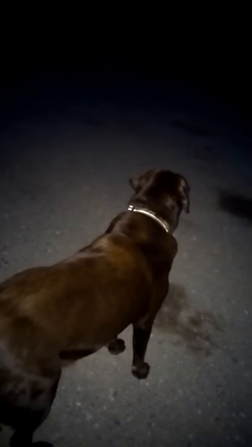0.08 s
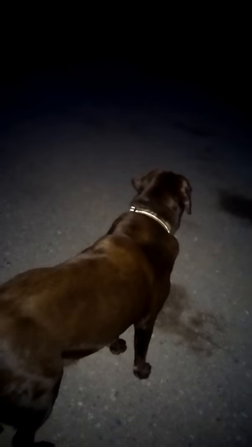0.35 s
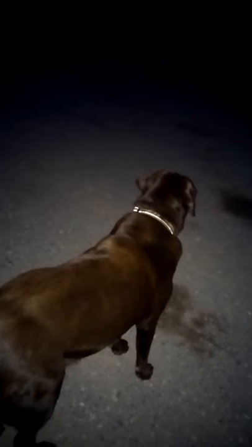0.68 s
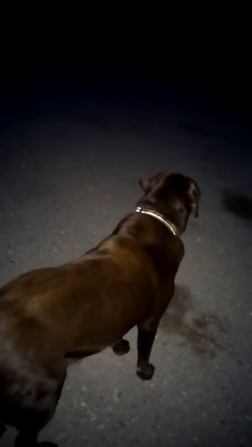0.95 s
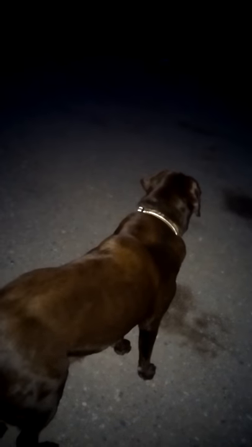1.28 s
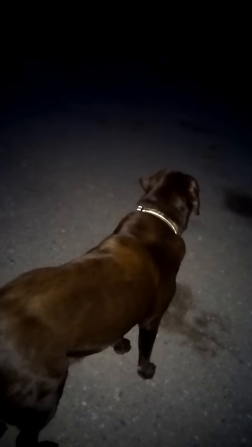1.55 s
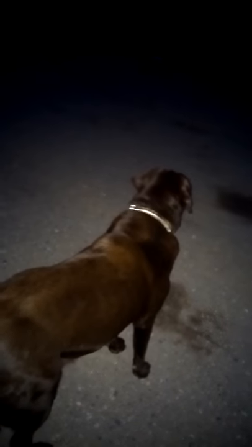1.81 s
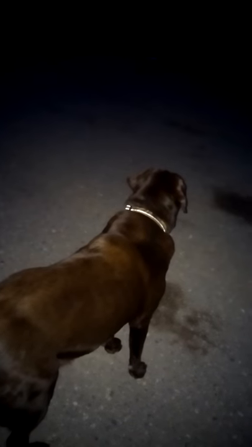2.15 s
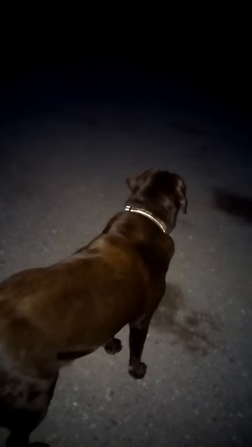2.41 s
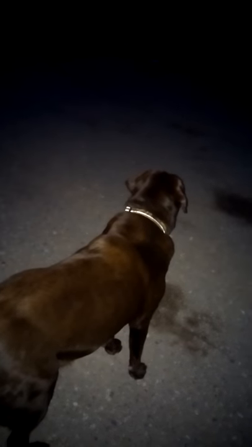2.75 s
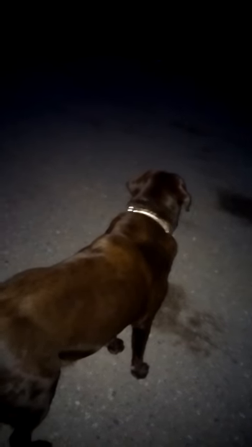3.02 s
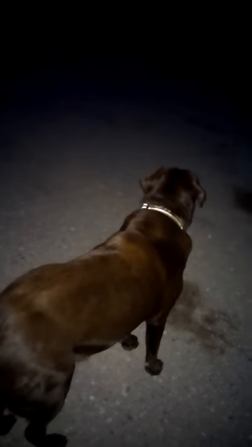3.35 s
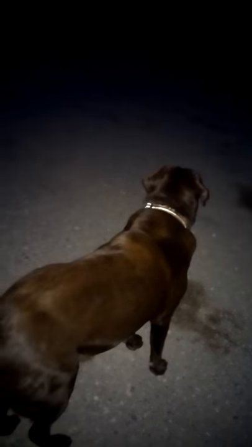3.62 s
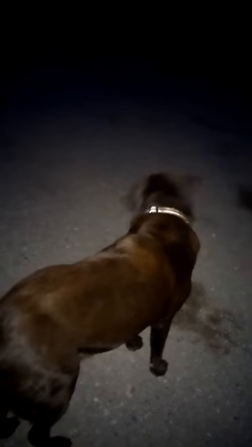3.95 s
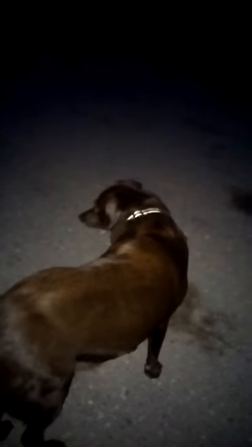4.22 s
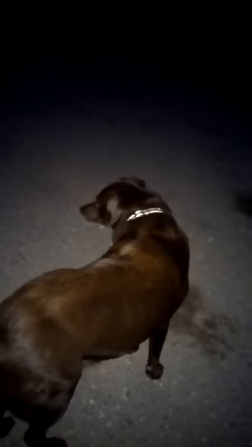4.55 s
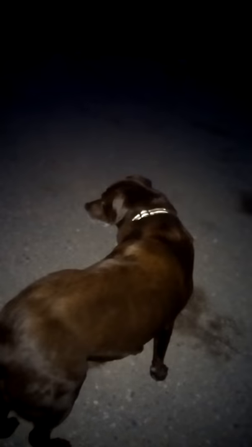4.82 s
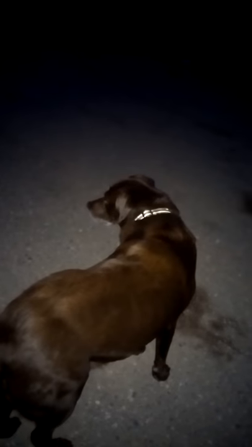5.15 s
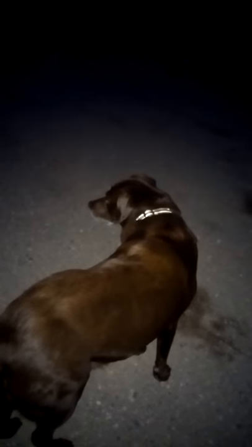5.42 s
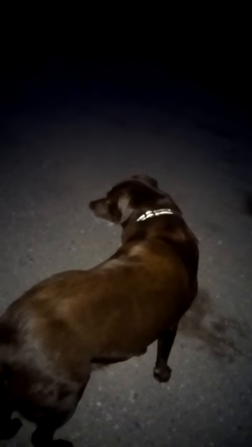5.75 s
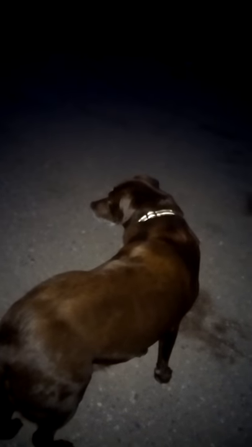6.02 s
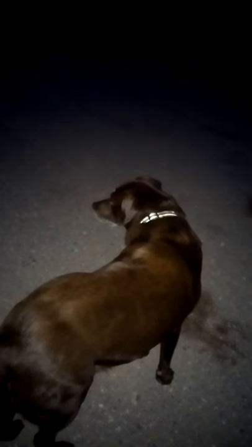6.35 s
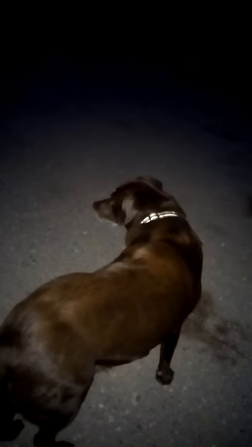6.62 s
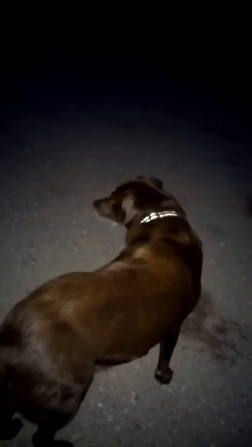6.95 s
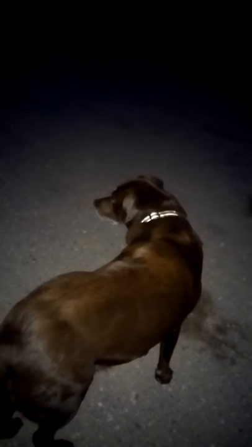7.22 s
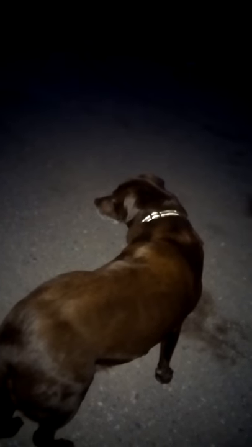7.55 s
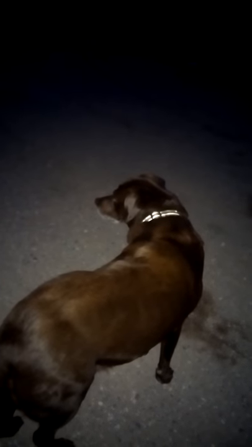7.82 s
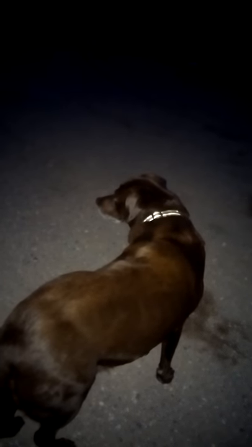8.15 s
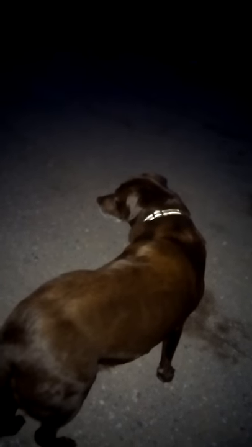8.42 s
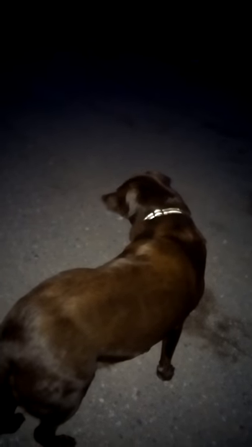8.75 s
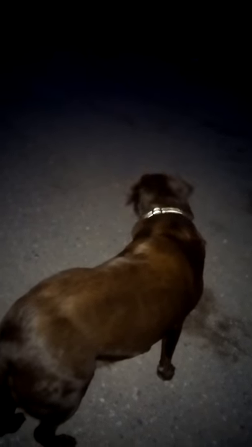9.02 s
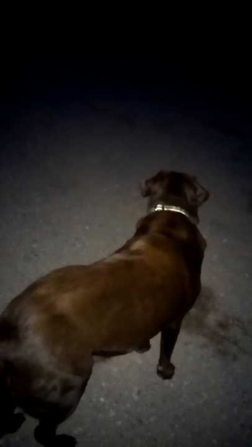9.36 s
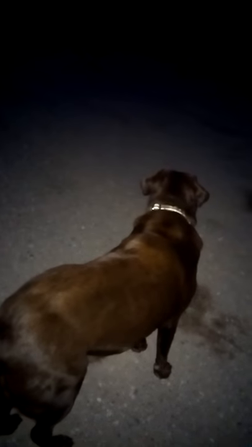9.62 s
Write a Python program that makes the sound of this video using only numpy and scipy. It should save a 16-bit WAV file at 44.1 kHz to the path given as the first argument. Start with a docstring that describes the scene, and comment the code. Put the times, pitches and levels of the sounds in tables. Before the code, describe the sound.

The setting is quiet open country at night. Right at the start, a distant coyote gives about six quick, high yips, each rising and falling in pitch with a slight break and a dull echo, ending by 0.8 seconds. From about 1 to 4 seconds there is only a faint low rumble, sputtering in short irregular swells, with thin microphone hiss flickering along with it. The rumble grows after 4 seconds. A faraway vehicle passes on the left, its soft tyre roar peaking just after 5 seconds and fading by 7. From about 7.5 seconds the rumble is stronger and carries a low, slowly rising engine drone. Between 8 and 8.7 seconds the coyote gives five more wavering yips, rougher and a little higher. The fluttering rumble, drone and hiss continue until the end, near 10 seconds.

```python
"""Open country on a still night. A far coyote gives two runs of wavering yips, each one arch of pitch
and effort, shaped by the throat and followed by a dull echo. Low rumble flutters and grows; a distant
vehicle passes with tyre noise and a slowly rising engine drone. The recorder's noise gate opens on
every swell, so the whole background and the microphone hiss flutter."""
import sys
import numpy as np
from scipy import signal
from scipy.fft import next_fast_len
from scipy.io import wavfile
from scipy.ndimage import uniform_filter1d

SR = 44100
rng = np.random.default_rng(int(sys.argv[2]) if len(sys.argv) > 2 else 0)


def digitize_waveform(pressure):
    """Quantize a signal to 16-bit integers and store it at the path in sys.argv[1].

    Rows of a 2-D input are taken as channels; values are limited to [-1, 1].
    """
    field = np.atleast_2d(pressure).T
    bounded = np.clip(field, -1, 1)
    quanta = np.round(bounded * 32767).astype(np.int16)
    wavfile.write(sys.argv[1], SR, quanta)


N = 435708
TIME = np.arange(N) / SR


def from_db(db):
    """Decibels to gain."""
    return 10 ** (np.asarray(db) / 20)


def unit_rms(x):
    """Scale to rms 1."""
    return x / np.sqrt(np.mean(x ** 2) + 1e-20)


def in_time(rows):
    """Each column of a time curve, at every sample."""
    times_s, *columns = np.transpose(rows)
    return [np.interp(TIME, times_s, column) for column in columns]


def at_hz(points, hz):
    """Read a curve on a log-frequency axis."""
    points_hz, values = np.transpose(points)
    return np.interp(np.log(hz), np.log(points_hz), values)


def pan(left_db):
    """Constant-power stereo gains."""
    return unit_rms(from_db(np.array([[left_db], [-left_db]]) / 2))


def delayed(x, delay_s):
    """One channel, delayed."""
    return np.interp(TIME - delay_s, TIME, x, left=0)


def drift(rate_hz):
    """Smooth random curve, rms 1."""
    pole = np.exp(-40 * np.pi * rate_hz / SR)
    slow = signal.lfilter([1], [1, -2 * pole, pole * pole], rng.standard_normal(N // 20 + 2002))[2000:]
    return np.interp(np.arange(N) / 20, np.arange(len(slow)), unit_rms(slow))


def flutter(rate_hz, limit=2.14):
    """Soft-limited drift."""
    return limit * np.tanh(drift(rate_hz) / limit)


def hump(progress, top_at):
    """Half sine over progress 0 to 1, peaking at top_at."""
    return np.abs(np.sin(np.pi * np.interp(progress, [0, np.clip(top_at, .1, .9), 1], [0, .5, 1])))


def bump(time_s, half_s, skew=.39):
    """Gaussian of height 1; skew steepens the rise and draws out the fall."""
    out = np.zeros(N)
    near = slice(*np.searchsorted(TIME, [time_s - 5 * half_s, time_s + 5 * half_s]))
    offset = (TIME[near] - time_s) / half_s + skew
    out[near] = np.exp(-(offset / (1 + skew * np.sign(offset))) ** 2)
    return out


def banded_noise(spectrum, correlation, glide=1, per_octave=3):
    """Stereo noise, rms 1; glide shifts the spectrum by a frequency ratio."""
    edges_hz = 20 * 2 ** (np.arange(10 * per_octave) / per_octave)
    white, out = rng.standard_normal((2, 2, N)), 0
    for k, band in enumerate(zip(edges_hz, edges_hz[1:])):
        hz = np.sqrt(band[0] * band[1])
        if spectrum[0][0] < hz < spectrum[-1][0]:
            mid, side = signal.sosfilt(signal.butter(2, band, "band", fs=SR, output="sos"), white[k % 2])
            alike = correlation if np.isscalar(correlation) else at_hz(correlation, hz)
            stereo = np.sqrt(1 + alike) * mid + np.sqrt(1 - alike) * side * [[1], [-1]]
            out = out + from_db(at_hz(spectrum, hz / glide)) * stereo
    return unit_rms(out)


def evened(x, span_s):
    """Level out swings slower than span_s, to rms 1."""
    window = signal.windows.hann(int(span_s * SR))
    power = np.mean(np.abs(signal.hilbert(x, next_fast_len(N))[:, :N]) ** 2, axis=0) / 2
    return x / np.sqrt(signal.fftconvolve(power, window / window.sum(), "same") + 1e-9)


# Yips, before register break and throat: (start [s], crest [s], end [s], start pitch [Hz],
# crest pitch [Hz], effort [dB], overtone [dB], roughness [0-1], effort peak [share of length])
YIPS = [(-.06, .003, .048, 780, 982, -40.5, -.5, .55, .8), (.103, .158, .208, 812, 945, -38.8, -1, .1, .36),
        (.208, .284, .35, 810, 1008, -37.7, -1, .22, .5), (.35, .427, .492, 770, 938, -39, -.5, .1, .45),
        (.492, .558, .63, 846, 926, -38.5, -1.5, .05, .42),
        (.644, .703, .753, 810, 903, -40.3, -2.5, .05, .48),
        (7.994, 8.052, 8.072, 725, 826, -35.5, -9, 1, .45),
        (8.165, 8.215, 8.265, 785, 925, -40.3, -2, .3, .36),
        (8.265, 8.332, 8.392, 800, 1065, -44, 1.5, .7, .28),
        (8.392, 8.462, 8.526, 918, 1097, -39.3, .5, .3, .5),
        (8.526, 8.603, 8.651, 815, 1050, -43, 1.5, .5, .6)]


def yip_controls(edge_s=.0069, join_s=.025, rest_hz=703, trough_db=-11.5, break_hz=822, drop_hz=69):
    """Pitch and effort arch in each yip; under break_hz the voice breaks to a lower register."""
    pitch_hz, effort, overtone_db, rough, voiced = np.zeros((5, N))
    for yip, following in zip(YIPS, YIPS[1:] + [None]):
        start_s, crest_s, end_s, start_hz, crest_hz, effort_db, bright_db, roughness, peak_at = yip
        if following and following[0] < end_s + join_s:   # falls into the next yip
            end_s, end_hz, fall_exponent = following[0], following[3], 1.8
        else:   # breaks off with a plunge
            end_hz, fall_exponent = rest_hz, .5
        near = slice(*np.searchsorted(TIME, [start_s - edge_s, end_s + edge_s]))
        t, length_s, rise_s = TIME[near] - start_s, end_s - start_s, crest_s - start_s
        rising = t < rise_s
        arch = hump(t / length_s, rise_s / length_s) ** np.where(rising, 1.8, fall_exponent)
        push = hump(t / length_s, peak_at) ** .92
        fade = np.clip(np.minimum(t, length_s - t) / edge_s + .5, 0, 1)
        foot_hz = np.where(rising, start_hz, end_hz)
        pitch_hz[near] += fade * (foot_hz + arch * (crest_hz - foot_hz))
        effort[near] += fade * from_db(effort_db + trough_db * (1 - push))
        overtone_db[near] += fade * bright_db
        rough[near] += fade * roughness * arch ** 2
        voiced[near] += fade
    pitch_hz /= np.maximum(voiced, 1e-12)
    low_register = (1 - np.tanh((pitch_hz - break_hz) / 5.5)) / 2
    return pitch_hz - drop_hz * low_register, effort, overtone_db, rough


# Response of throat and long air path: (frequency [Hz], gain [dB])
THROAT = [(680, -10.5), (750, -17.5), (810, -1.5), (920, 0.07), (1010, -3.5), (1110, -6), (1260, -5),
          (1450, -1.5), (1540, 0.5), (1650, -7.5), (1850, -17), (2150, -19.5), (2350, -23), (2800, -32),
          (3100, -40)]


def coyote(break_hz=822, third_db=-9, right_lead_rad=1.23):
    """A nearly pure voice shaped by the throat; rough yips jitter, shake and double their period."""
    pitch_hz, effort, overtone_db, rough = yip_controls(break_hz=break_hz)
    jitter = (.0052 + .028 * rough) * drift(132)
    shimmer_db = (1 + 3.5 * rough) * flutter(36)
    rasp = (.066 + .33 * rough) * drift(107)
    pitch_hz = pitch_hz * (1 + jitter)
    effort = effort * from_db(shimmer_db) * (1 + rasp)
    on, out = effort > 0, np.zeros((2, N))
    phase = 2 * np.pi * np.cumsum(pitch_hz[on]) / SR
    lead_rad = np.array([[0], [right_lead_rad]])   # direct and ground paths sum differently per side
    overtone = from_db(overtone_db[on]) * pan(.3)
    doubling = .3 * rough[on] * (pitch_hz[on] > break_hz)   # upper register only
    for ratio, gain in ((1, pan(3.4)), (1.5, doubling), (2, overtone), (3, overtone * from_db(third_db))):
        throat = from_db(at_hz(THROAT, ratio * pitch_hz[on]))
        out[:, on] += gain * throat * np.sin(ratio * phase + lead_rad)
    return np.sqrt(2) * effort * out


def echoes(x, echo_s=.047, echo_db=-18, cutoff_hz=1170, scatter_db=-16, scatter_s=.03, count=40):
    """One dull echo; ground and brush add faint ones, different on each side."""
    lowpass = signal.butter(3, cutoff_hz, fs=SR, output="sos")
    out = x.copy()
    for side, direct in zip(out, x):
        side += from_db(echo_db) * signal.sosfilt(lowpass, delayed(direct, echo_s))
        delays_s = .00212 + rng.exponential(scatter_s, count)
        gains = rng.standard_normal(count) * np.exp(-delays_s / (2 * scatter_s))
        for lag, gain in zip((delays_s * SR).astype(int), gains / np.linalg.norm(gains)):
            side[lag:] += from_db(scatter_db) * gain * direct[:N - lag]
    return out


# Slow course of the rumble: (time [s], level [dB])
RUMBLE_COURSE = [(0.0, -48), (0.7, -49), (0.8, -57.5), (1.4, -57), (2.5, -57.5), (2.9, -59.5),
                 (3.45, -54.5), (3.7, -63.5), (4.05, -57), (4.2, -44.5), (4.7, -48.5), (5.4, -50),
                 (5.9, -46.5), (6.45, -47), (7.42, -51), (7.62, -42), (8.3, -43.5), (9.88, -43.0)]
# Brief dips: (time [s], half length [s])
LULLS = [(0.098, 0.012), (0.628, 0.029), (4.235, 0.021), (4.434, 0.025), (4.994, 0.008), (5.359, 0.021),
         (5.478, 0.012), (5.617, 0.0079), (5.78, 0.0027), (6.132, 0.013), (6.513, 0.013), (6.57, 0.0072),
         (6.707, 0.013), (6.778, 0.0079), (6.905, 0.0086), (7.012, 0.02), (7.141, 0.011), (7.412, 0.018),
         (7.809, 0.017), (7.927, 0.0063), (8.134, 0.03), (8.274, 0.016), (8.724, 0.012), (8.983, 0.0072),
         (9.344, 0.0067), (9.461, 0.027), (9.751, 0.0075)]
# Short added swells: (time [s], level [dB], half length [s])
SWELLS = [(0.866, -49, 0.0075), (0.969, -47.0, 0.011), (1.073, -43, 0.01), (1.102, -46.5, 0.011),
          (1.184, -43.5, 0.012), (1.216, -48, 0.014), (1.452, -47, 0.01), (1.565, -49, 0.0076),
          (1.705, -46.5, 0.0092), (1.823, -45.5, 0.0083), (1.996, -47, 0.0086), (2.033, -47.5, 0.01),
          (2.069, -45.5, 0.0084), (2.124, -45, 0.0083), (2.22, -50.5, 0.018), (2.292, -44.0, 0.018),
          (2.351, -50, 0.0046), (2.389, -49.5, 0.0046), (2.597, -48.5, 0.0091), (2.638, -48.5, 0.011),
          (2.67, -52, 0.008), (2.748, -44, 0.013), (2.793, -44.5, 0.018), (2.945, -46.5, 0.0083),
          (2.974, -50, 0.007), (3.019, -48, 0.0077), (3.058, -50.5, 0.01), (3.108, -45.5, 0.0074),
          (3.141, -47.5, 0.009), (3.215, -42, 0.0071), (3.255, -46, 0.012), (3.323, -46.5, 0.019),
          (3.351, -47.5, 0.0058), (3.406, -49, 0.011), (3.452, -44, 0.013), (3.49, -43.5, 0.012),
          (3.548, -48, 0.006), (3.594, -52.5, 0.017), (3.677, -51, 0.011), (3.773, -51.5, 0.01),
          (3.862, -47.5, 0.017), (4.042, -44.5, 0.006), (4.08, -46, 0.0065), (4.141, -42, 0.016),
          (4.179, -46.5, 0.014), (4.349, -41, 0.0059), (4.551, -45.5, 0.01), (4.664, -48.5, 0.023),
          (4.741, -45, 0.0028), (4.918, -43, 0.013), (5.583, -47.0, 0.019), (5.81, -44, 0.018),
          (5.881, -44, 0.021), (6.045, -42, 0.018), (6.157, -43.5, 0.0081), (6.233, -48.5, 0.0045),
          (6.28, -42, 0.024), (6.358, -42, 0.025), (6.459, -45, 0.013), (6.533, -44.5, 0.0062),
          (6.615, -41, 0.019), (6.688, -46.5, 0.009), (6.736, -40, 0.011), (6.799, -44, 0.0093),
          (6.863, -41, 0.012), (6.924, -44, 0.0057), (6.971, -41.5, 0.016), (7.054, -41.5, 0.015),
          (7.11, -41, 0.0073), (7.187, -42.5, 0.031), (7.26, -43, 0.025), (7.306, -42, 0.0052),
          (7.371, -42.5, 0.0058), (7.452, -44.5, 0.019), (7.533, -43, 0.019), (7.63, -43.5, 0.03),
          (7.762, -41, 0.0089), (7.829, -40.5, 0.012), (7.87, -42, 0.014), (7.983, -43, 0.049),
          (8.703, -42, 0.015), (8.822, -41.5, 0.048), (8.906, -40.5, 0.0056), (9.112, -42.5, 0.013),
          (9.22, -40.5, 0.056), (9.395, -42.5, 0.015), (9.558, -44.5, 0.0037), (9.665, -43.0, 0.028),
          (9.804, -44, 0.012)]


def rumble_sputter(flutter_db=1.7, lull_db=-11):
    """The rumble flutters, dips and swells; returns its power and the ratio to its slow course."""
    course_db, = in_time(RUMBLE_COURSE)
    lulls = sum(bump(time_s, half_s, skew=0) for time_s, half_s in LULLS)
    swells = sum(from_db(db) ** 2 * bump(time_s, half_s) for time_s, db, half_s in SWELLS)
    power = from_db(course_db + flutter_db * flutter(29.5) + lull_db * lulls) ** 2 + swells
    return power, power / from_db(course_db) ** 2


# Engine: (time [s], firing rate [Hz], level re rumble noise [dB])
ENGINE = [(0, 133.6, -29.5), (5.4, 135.1, -18.5), (6.1, 139.7, -9), (7.3, 136.4, -13.5), (7.7, 137.5, -1),
          (8.3, 141.1, 0.5), (8.8, 142, 2.5), (9.88, 144.3, 4)]


def engine_drone(waver_db=4):
    """Wavering firing tone with a faint half order and octave."""
    firing_hz, level_db = in_time(ENGINE)
    phase = 2 * np.pi * np.cumsum(firing_hz * (1 + .0054 * drift(4.3))) / SR
    tone = np.sin(phase) + from_db(-20.5) * np.sin(phase / 2) + from_db(-30) * np.sin(2 * phase)
    return np.sqrt(2) * from_db(level_db + waver_db * flutter(10.8)) * tone


# Rumble noise: (frequency [Hz], relative density [dB])
RUMBLE_SPECTRUM = [(25, -16), (42, -12.5), (55, -8), (70, 2.5), (95, 1.5), (135, 2), (180, -6.5),
                   (250, -15), (400, -19.5), (560, -22.5), (750, -25), (950, -32.5), (1200, -36.5)]
# Rumble width: (frequency [Hz], left-right correlation [0-1])
RUMBLE_CORRELATION = [(60, 0.89), (140, 0.93), (290, 0.36), (640, 0.042)]


def rumble(power):
    """Low noise and engine drone swell and sink together."""
    low = banded_noise(RUMBLE_SPECTRUM, RUMBLE_CORRELATION) + engine_drone()
    return evened(low, span_s=.034) * np.sqrt(power) * pan(4.3)


# Slow course of the tyre roar: (time [s], level [dB])
TYRE_COURSE = [(0.0, -54.5), (1.15, -58.5), (1.5, -63), (1.9, -63), (2.3, -59), (2.65, -56.5), (2.9, -58.5),
               (3.35, -53), (3.65, -56.5), (4.05, -64), (4.4, -57), (4.65, -49.5), (4.85, -50),
               (5.1, -44.5), (5.27, -43.5), (5.5, -49), (5.85, -50.5), (6.5, -56.5), (7.15, -64),
               (9.88, -63)]
# Brief added surges: (time [s], level [dB])
TYRE_SURGES = [(2.675, -51), (3.352, -51), (4.742, -58), (5.05, -44), (5.095, -42.5), (5.215, -44.5),
               (5.251, -44.5), (5.344, -43), (5.437, -45.5), (5.709, -46)]
# Brightness, rising again at closest approach: (time [s], centre [Hz])
TYRE_CENTRE = [(0, 810), (1.3, 870), (2.4, 835), (3.3, 775), (4.2, 713), (4.7, 713), (4.92, 768),
               (5.14, 840), (5.3, 835), (5.5, 793), (6.45, 764), (7, 735), (9.88, 770)]
# Tyre noise centred on reference_hz: (frequency [Hz], relative density [dB])
TYRE_SPECTRUM = [(300, -17), (380, -17), (480, -12.5), (560, -15.5), (690, 0), (820, -0.5), (960, -7),
                 (1100, -18), (1300, -29.5), (1700, -35), (2000, -42)]


def tyres(rumble_swing, reference_hz=785, flutter_db=.56, surge_half_s=.011, right_lag_s=.00035):
    """Tyre roar from one far spot on the left; it follows part of the rumble's swing."""
    course_db, = in_time(TYRE_COURSE)
    centre_hz, = in_time(TYRE_CENTRE)
    base = rumble_swing ** .3 * from_db(course_db + flutter_db * flutter(25))
    surges = sum(from_db(db) ** 2 * bump(time_s, surge_half_s) for time_s, db in TYRE_SURGES)
    roar = banded_noise(TYRE_SPECTRUM, correlation=.88, glide=centre_hz / reference_hz, per_octave=6)
    left, right = evened(roar, span_s=.038)
    return np.sqrt(base ** 2 + surges) * np.array([left, delayed(right, right_lag_s)]) * pan(8)


# Microphone hiss: (frequency [Hz], relative density [dB])
HISS_SPECTRUM = [(200, 15), (500, 7), (1200, 4), (2000, 2.5), (2800, 0.5), (3200, -1.5), (5000, -3),
                 (7600, -4), (9000, -7.5), (12000, -9.5), (14500, -15.5), (16000, -16)]


def microphone_hiss(hiss_db=-61.5, whine_db=-87, whine_hz=11658):
    """Steady hiss with a thin electric whine."""
    whine = np.sin(2 * np.pi * np.cumsum(whine_hz + 25 * drift(22)) / SR)
    hiss = banded_noise(HISS_SPECTRUM, correlation=0)
    return (from_db(hiss_db) * hiss + from_db(whine_db) * whine) * pan(2.8)


def scene():
    """The coyote over the night's background."""
    power, swing = rumble_sputter()
    return echoes(coyote()) + rumble(power) + tyres(swing) + microphone_hiss()


def noise_gate(x, threshold_db=-39.5, slope=1.546, depth_db=19.5, knee_db=.5,
               follow_s=.0057, ahead_s=.002, release_db_per_s=650):
    """Expander: gain falls with the level under the threshold; opens fast, closes more slowly."""
    pole = np.exp(-1 / (follow_s * SR))
    power = uniform_filter1d(np.mean(x ** 2, axis=0), size=161)
    followed, _ = signal.lfilter([1 - pole], [1, -pole], power, zi=[power[:int(follow_s * SR)].mean()])
    level_db = np.interp(TIME + ahead_s, TIME, 10 * np.log10(np.maximum(followed, 1e-12)))
    target_db = np.minimum(slope * (level_db - threshold_db), 0)
    release_db = release_db_per_s * TIME
    gain_db = np.maximum.accumulate(target_db + release_db) - release_db
    floored_db = knee_db * np.logaddexp(gain_db / knee_db, -depth_db / knee_db)
    return x * from_db(floored_db)


def record(dry, low_cut_hz=40, high_cut_hz=15500):
    """Gate the whole mix, then cut the deepest bass and the top."""
    highpass = signal.butter(2, low_cut_hz, "high", fs=SR, output="sos")
    lowpass = signal.ellip(10, .1, 70, high_cut_hz, fs=SR, output="sos")
    return signal.sosfilt(lowpass, signal.sosfilt(highpass, noise_gate(dry)))


dry = scene()
out = record(dry)
digitize_waveform(out)
```